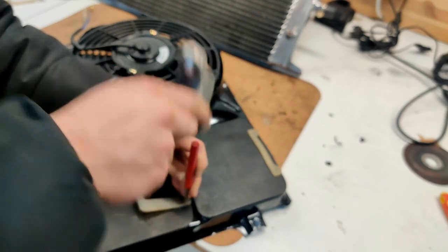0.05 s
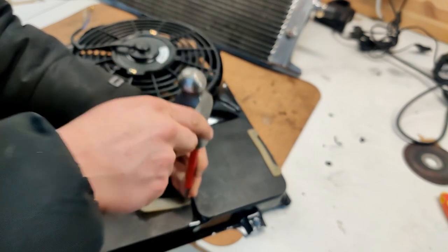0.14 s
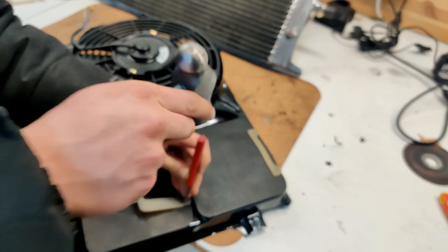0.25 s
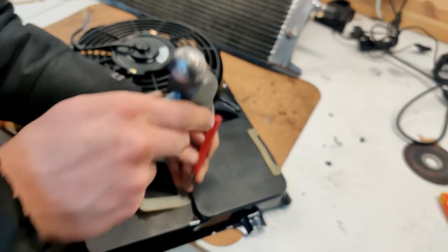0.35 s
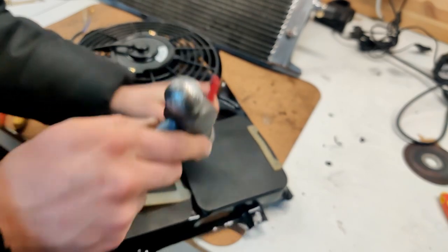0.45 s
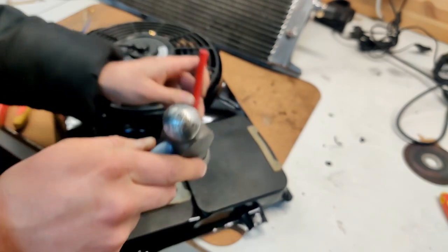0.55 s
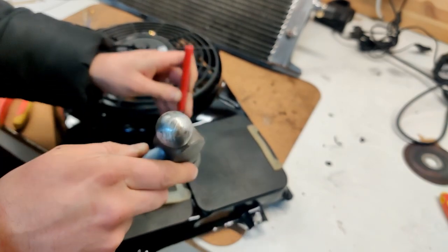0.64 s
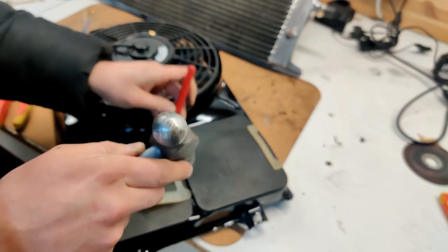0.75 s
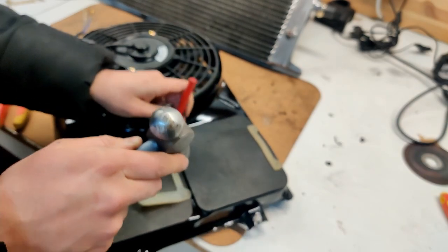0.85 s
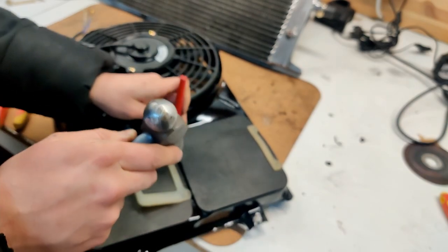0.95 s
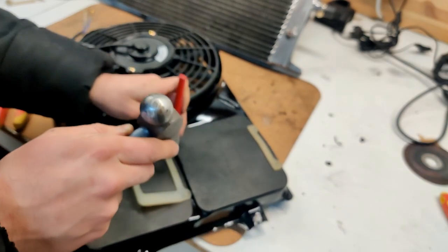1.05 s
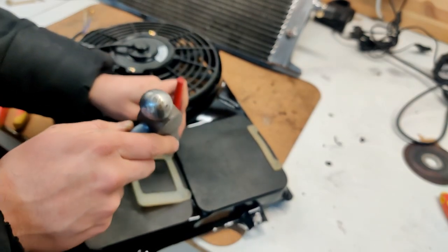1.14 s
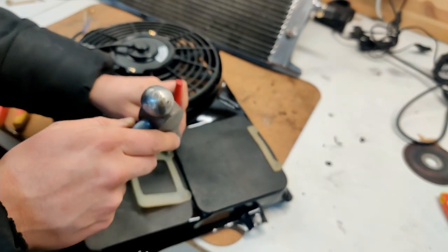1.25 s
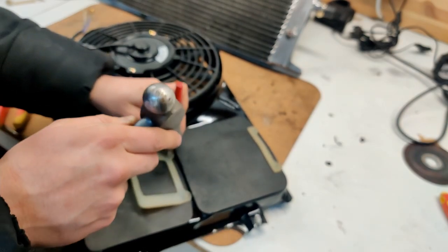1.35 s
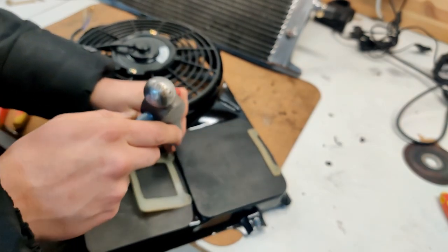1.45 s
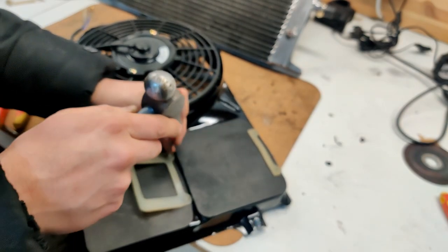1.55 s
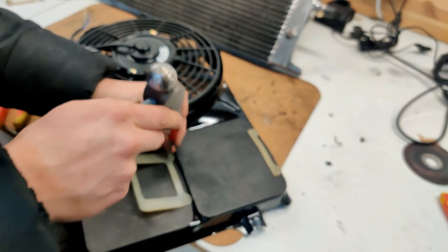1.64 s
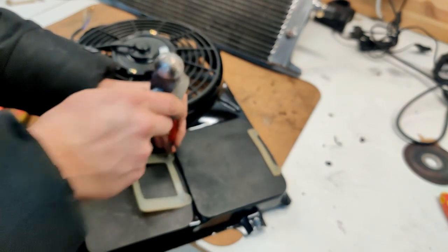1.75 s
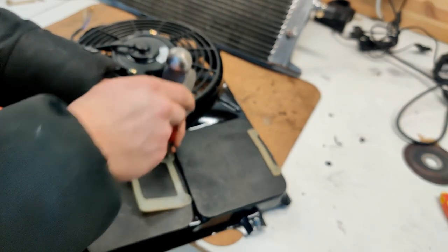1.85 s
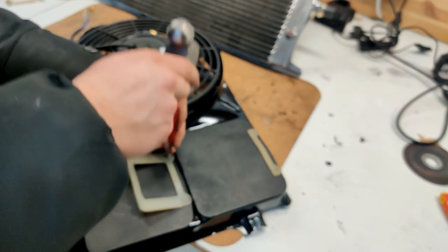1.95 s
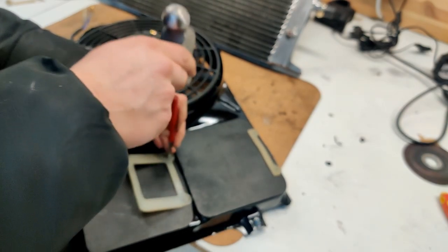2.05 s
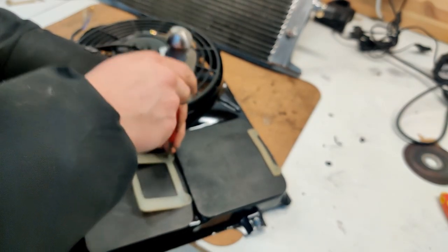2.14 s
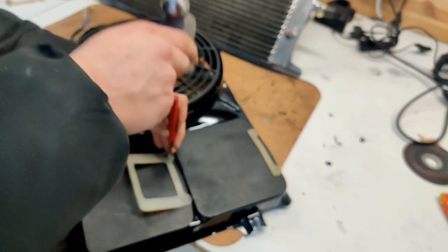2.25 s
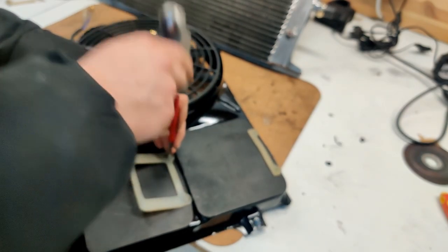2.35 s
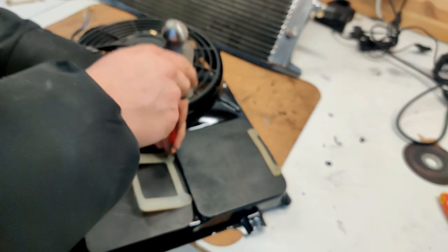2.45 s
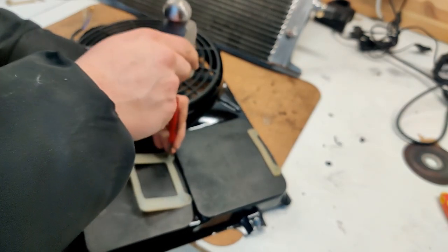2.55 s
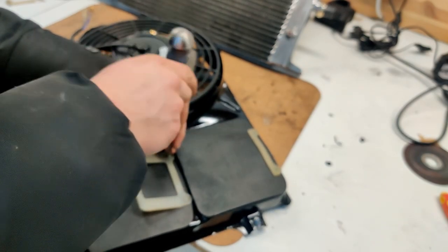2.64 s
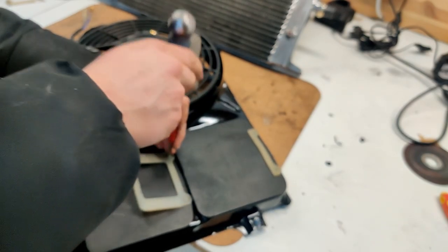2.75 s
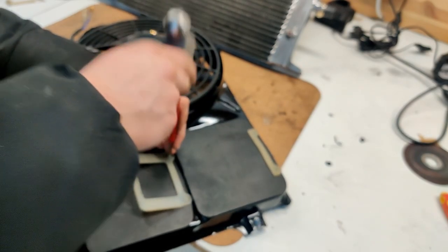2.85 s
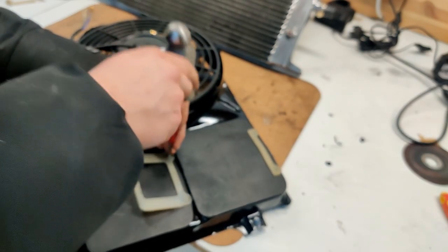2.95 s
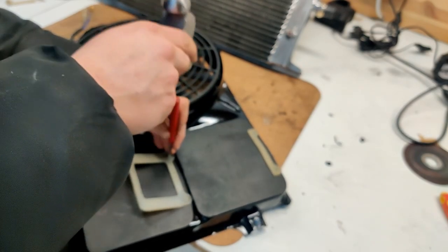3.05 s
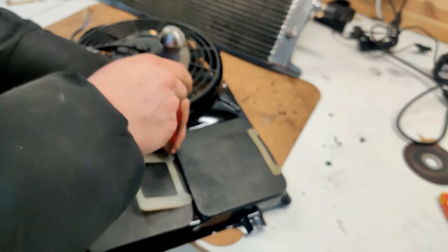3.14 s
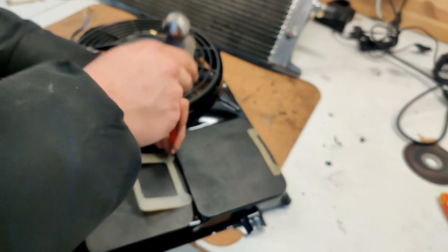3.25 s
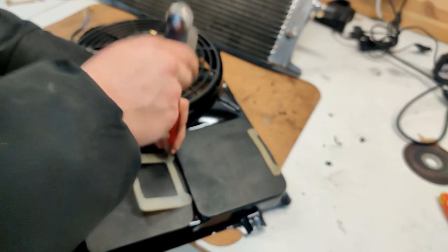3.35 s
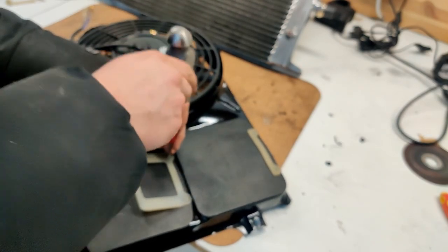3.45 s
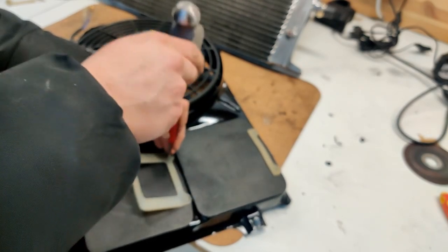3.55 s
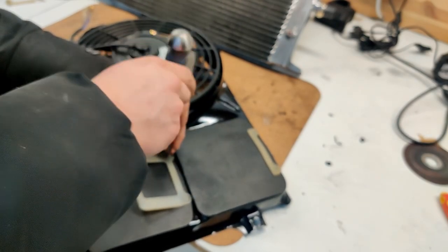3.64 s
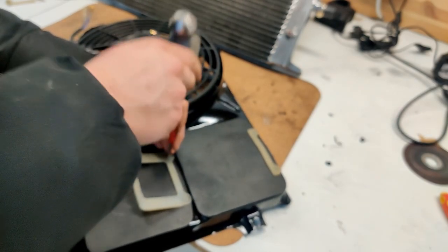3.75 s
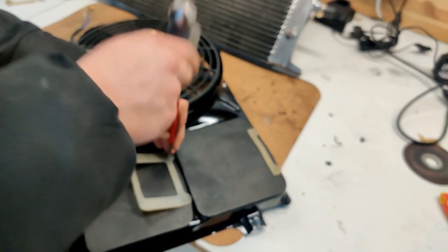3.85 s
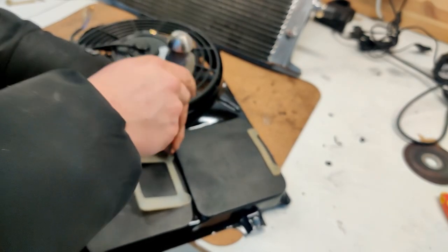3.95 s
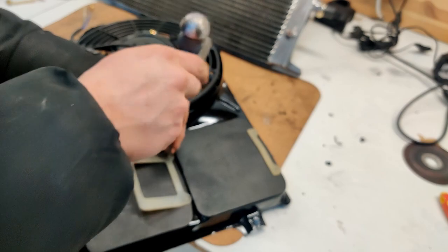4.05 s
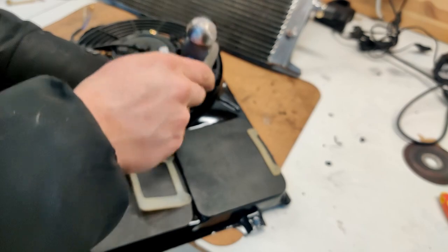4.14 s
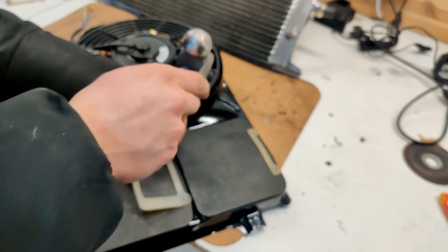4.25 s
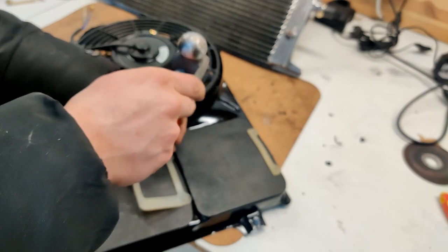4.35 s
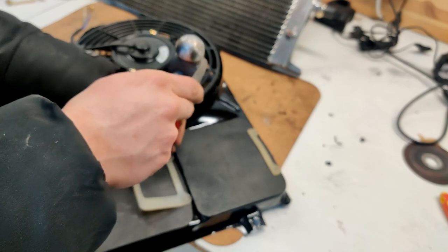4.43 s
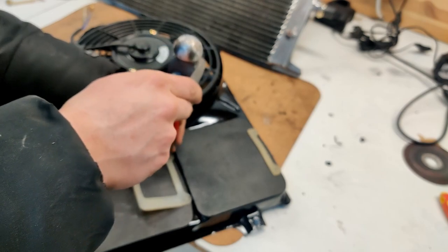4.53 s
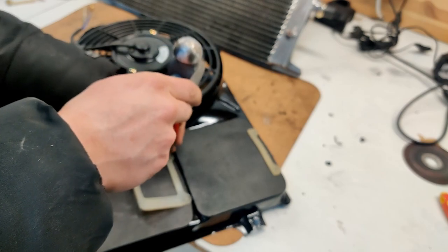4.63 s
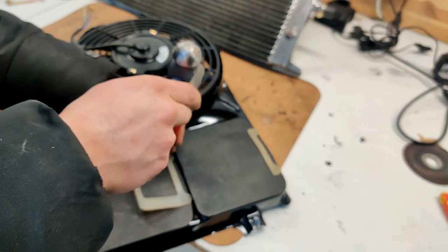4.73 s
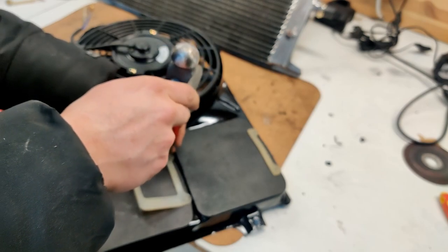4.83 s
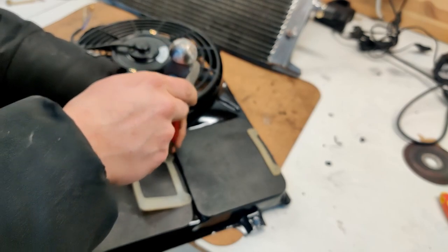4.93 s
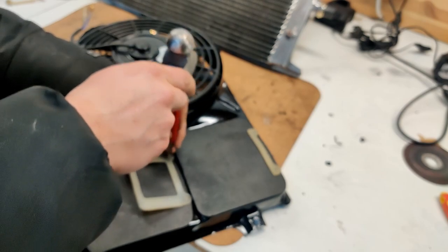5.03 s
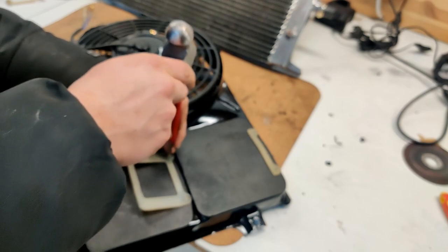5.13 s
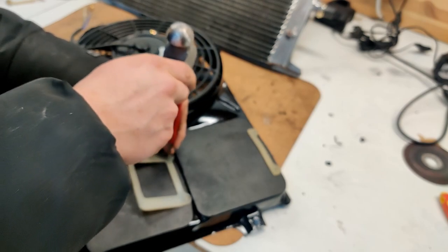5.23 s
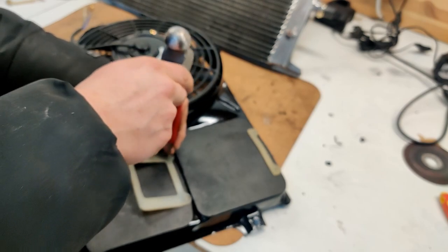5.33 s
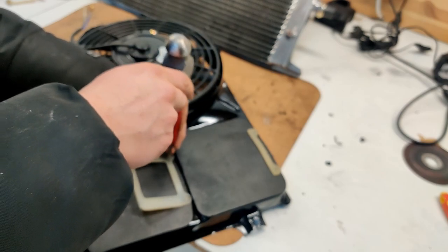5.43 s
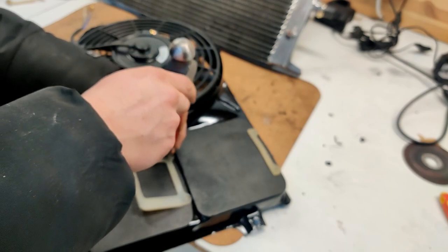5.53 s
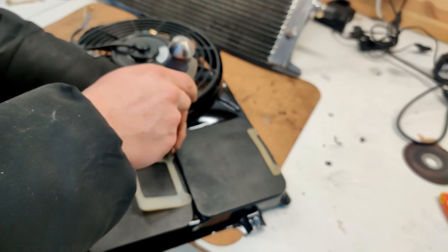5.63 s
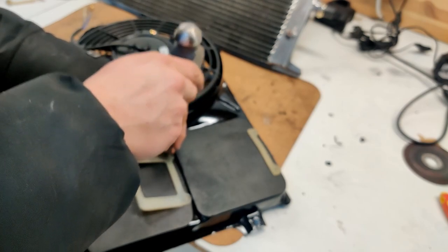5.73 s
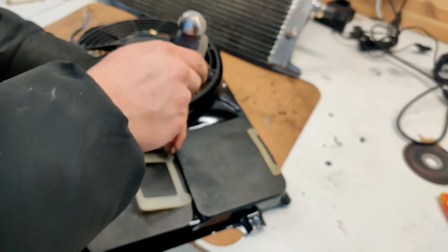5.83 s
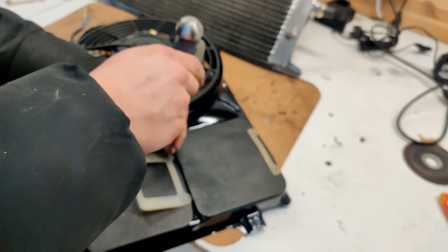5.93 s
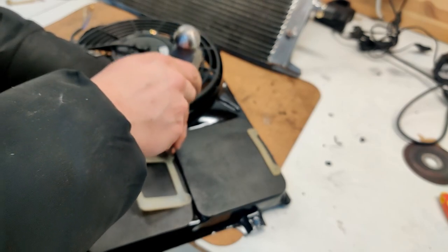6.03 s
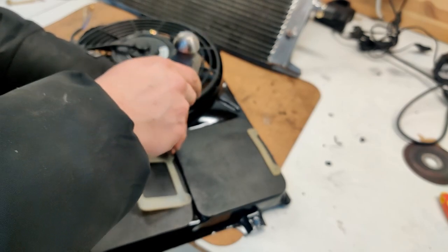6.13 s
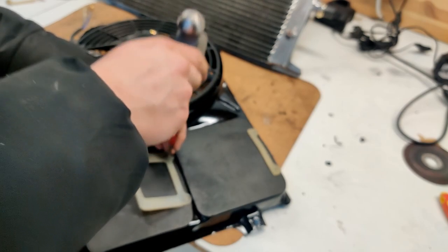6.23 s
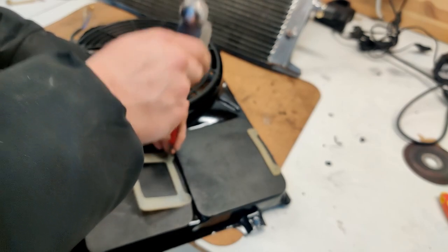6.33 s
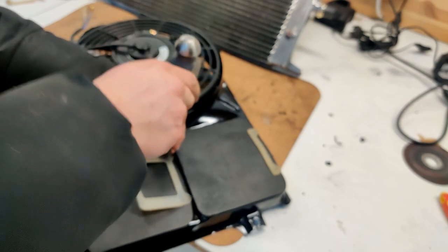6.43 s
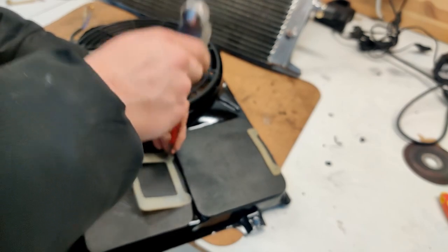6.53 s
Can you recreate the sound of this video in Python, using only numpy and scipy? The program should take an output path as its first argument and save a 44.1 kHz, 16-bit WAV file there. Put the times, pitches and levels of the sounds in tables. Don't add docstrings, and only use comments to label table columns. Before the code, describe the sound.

Sharp, close metallic hammer taps with a plastic clack and brief rattle, broken by soft handling touches on a wooden bench, almost no room noise.

```python
import sys
import numpy as np
from scipy import signal
from scipy.fft import rfft, irfft, next_fast_len
from scipy.io import wavfile
from scipy.ndimage import uniform_filter1d, map_coordinates

SR = 44100
rng = np.random.default_rng(int(sys.argv[2]) if len(sys.argv) > 2 else 0)


def log_audio(samples):
    frames = np.atleast_2d(samples).T
    limited = np.clip(frames, -1, 1)
    pcm = np.round(limited * 32767).astype(np.int16)
    wavfile.write(sys.argv[1], SR, pcm)


def level_to_linear(level):
    exponent = np.asarray(level, float) / 20
    return 10 ** exponent


N = 290178

# freq_hz, density_db_per_hz
FLOOR_SPECTRUM = [(12, -33), (20, -0.5), (91, -23), (193, -22.5), (228, -27), (2820, -42.5), (3530, -39),
                  (5230, -42.5), (11800, -42.5), (16000, -52)]
FLOOR_DB = -73.5
# freq_hz, t60_s
GARAGE_T60 = [(200, 0.63), (1500, 0.36), (10000, 0.34)]
# freq_hz, level_db
WALL_COLOUR = [(100, 0.0), (3000, 0.0), (6000, -4.0), (10000, -13.0)]
CHATTER_START_S, CHATTER_LENGTH_S, CHATTER_DB, CHATTER_FADE_DB_PER_S = 5.72, 0.1, -60, 210

# peak_s, level_db, rise_db_per_s, fall_db_per_s
RUSTLES = [(0.001, -55.5, 202, 199.5), (0.436, -67.5, 31, 22), (0.571, -51.5, 1300, 1100),
           (.592, -51.5, 1500, 700), (0.996, -66.5, 600, 500), (1.525, -70.5, 497, 400),
           (1.921, -71, 118, 146), (2.084, -79.5, 17.5, 147), (4.17, -68.5, 194.5, 25.5),
           (5.254, -68, 902.5, 500), (5.48, -84, 57, 40), (5.503, -72.5, 500.5, 500),
           (6.415, -58.5, 400, 601.5)]
# freq_hz, density_db_per_hz
CLOTH_SPECTRUM = [(120, -43), (200, -10), (263, 2), (334, -3), (1170, -6.5), (1540, -7), (4220, -15.5),
                  (12000, -32), (15600, -73.5), (22000, -120)]

# freq_hz, level_db, start_s, rise_s, t60_s
LEG_MODES = [(37.5, 0.5, .035, 0.026, 1.5), (31, -5, 0.03, .015, .5), (61.6, -12.5, .0, 0.08, 1.6),
             (68, -1, .035, .008, 0.44), (85, -1.5, 0, 0.0013, .121)]
SETTLE_S, STILL_S = 0.26, 0.58
# freq_hz, level_db, t60_s
WOBBLE_MODES = [(35, -4.5, 0.7), (50, 3.5, .6), (60.3, -5.5, .5), (108, -10.5, .4), (135, -13, .35)]
# start_s, level_db
LEAN_EVENTS = [(0.001, -34), (0.53, -37), (0.704, -45), (0.829, -52.5), (1.001, -72), (1.21, -63.5),
               (1.402, -65.5), (1.544, -42), (1.629, -51.5), (1.932, -64), (2.099, -63.5), (4.36, -52),
               (4.549, -61), (4.659, -63.5), (5.27, -55.5), (5.9, -63.5), (6.1, -69)]

# start_s, peak_db, bright_db,
# board_db, tray_db
TOUCH_EVENTS = [(0.001, -48.5, 0.5, 2, -11), (0.434, -46, -16.5, -21.5, -39), (0.529, -36.5, -18, -3, -5.5),
                (0.567, -33.5, -13.5, -41, -34), (0.608, -65, -15, -28, -21),
                (0.704, -57.5, -11.5, 3.5, -18), (0.727, -54, -16, -7, -10),
                (0.959, -52.5, -10.5, -10, -30), (1.208, -57, -17, -3.5, -14), (1.402, -52, -22, -11, -15),
                (1.504, -61.5, -22, -19, -16), (1.544, -57.5, -24, 8.5, -8), (1.566, -52, -10.5, 4.5, -6.5),
                (1.935, -43, -2, -22, -24.5), (4.225, -55.5, -6, -3, -3.5), (4.546, -54, -31.5, -9.5, 0.5),
                (4.639, -69, -8, -9, -10), (4.849, -65, -5, -15, -5), (5.251, -44.5, -23.5, -14, -7.5),
                (5.276, -41, -21.5, -22, -8), (5.954, -60, -12.5, -13.5, -15)]
# freq_hz, level_db, t60_s
BOARD_MODES = [(162, 7, 0.51), (131, -4.5, 0.31)]
# freq_hz, level_db, t60_s
TRAY_MODES = [(272.1, 7.5, 0.2), (320, 2.5, .2)]
# freq_hz, level_db, t60_s
TIP_MODES = [(1800, -7, 0.061), (2600, 1, .07), (3300, -2.5, 0.052), (3900, 0, .12), (4500, -4, .1)]
SCUFF_T60_S = 0.17

# start_s, peak_db, punch_ping_db, bench_thud_db, leg_sway_db
BLOW_EVENTS = [(0.153, -6, -17.5, -31, -30), (2.2, -13, -15.5, -24.5, -33), (2.466, -6.5, -17, -27.5, -29),
               (2.719, -5, -22, -21.5, -29.5), (2.967, -6, -21, -18.5, -30), (3.228, -4.5, -24, -22, -30.5),
               (3.476, -5, -22, -20, -29), (3.725, -5.5, -21, -21.5, -28), (3.977, -4, -23, -21.5, -28),
               (5.565, -24.5, -51.5, -25, -50.5), (6.166, -12.5, -30, -24, -37),
               (6.481, -4, -23.5, -14.5, -33)]
# freq_hz, level_db, t60_s
HOUSING_MODES = [(470, -8, .07), (610, -14, .07), (865, 3, .07), (1090, -8, .07), (1235, -5, .06),
                 (1548, -4, .07), (1700, -6, .06), (1975, -3, .07), (2245, -2, .07), (2450, -4, .07),
                 (2860, -8, .07), (3219, -4, .07), (3520, -2, .08), (3630, -4, .07), (3830, -11, .07),
                 (4460, -13, .07), (4650, -14, .08)]
# freq_hz, level_db, t60_s
SHEET_MODES = [(1055, -4, .16), (1211, 0, .2), (1458, -4, .2), (1916, -3, .2), (2223, -7, .18),
               (2390, -6, .19), (2444, -6, .2), (2567, -6, .18), (2675, -8, .18), (2863, -4, .18),
               (3219, -8, .18), (3267, -8, .18), (3434, -9, .18), (3531, -3, .19), (3617, -8, .18),
               (4037, -10, .2), (4360, -13, .18), (4468, -13, .18), (4600, -13, .18), (4700, -14, .17),
               (4914, -15, .15)]
# freq_hz, level_db, t60_s
PUNCH_MODES = [(5857, -4, .13), (6066, -6, .13), (6637, -7, .13), (6869, -3, .13), (7358, -5, .13),
               (8177, 0, .08), (8344, -2, .1), (9356, -4, .12), (9480, -6, .11), (9650, -4, .12),
               (9862, -6, .12), (10200, -10, .12), (11290, -7, .11)]
# freq_hz, level_db, t60_s
BENCH_MODES = [(110.67, -4, 0.36), (139.7, -2, 0.28), (149, -3, 0.22), (290, -2.5, 0.3), (308, -2.5, 0.27),
               (397, -7, 0.093)]
# freq_hz, density_db_per_hz
CLATTER_SPECTRUM = [(50, -37.5), (80, -4.5), (210, -6.5), (750, -9), (900, -7), (1900, -8), (2400, -9),
                    (3600, -11), (5300, -14), (9600, -19), (11500, -29), (12300, -42), (16000, -56.5)]
# freq_hz, t60_s
CLATTER_T60 = [(100, 0.66), (300, 0.33), (800, 0.19), (2000, 0.16), (5000, 0.16), (11000, 0.043),
               (13000, 0.087)]
# freq_hz, t60_s
RATTLE_T60 = [(300, 0.56), (1000, 0.16), (4000, 0.33), (7000, .33), (10000, 0.29), (12500, .26),
              (16000, .2)]
# freq_hz, level_db
RATTLE_COLOUR = [(4500, -2.0), (6500, -2.5), (11000, -0.47), (12500, 11.5), (15500, 15.5)]
# freq_hz, level_db
SOFT_COLOUR = [(1000, -2), (1600, 2.5), (2200, 0.7), (2600, -7), (3600, -10), (4200, 1.5), (6000, -0.5)]
# freq_hz, slope_db_per_db
HARDNESS_SLOPE = [(4000, 0.0093), (6000, 0.86)]
# freq_hz, t60_s; freq_hz, level_db
CRACK_T60 = [(9000, 0.064), (12500, 0.064), (15000, .09)]
CRACK_COLOUR = [(9000, -31.5), (12000, 0.5), (15000, -6.0), (16300, -28.5)]
# freq_hz, level_db
TICK_COLOUR = [(1500, -20.5), (4000, -1), (11500, -.5), (12500, -14), (16000, -19.5)]
CLACK_DB, CLACK_PER_PING, CRACK_DB, CRACK_PER_PING = -1.5, .22, -7.5, 1.4
BAND_SCATTER_DB = 4
PING_TOP_DB = -20.5
FULL_DB, SOFT_RANGE_DB = -7, 19


def unit(x):
    return x / np.sqrt(np.mean(x ** 2) + 1e-20)


def along(points, hz):
    f, v = np.transpose(points)
    return np.interp(np.log(hz + 1), np.log(f + 1), v)


def coloured(spectrum):
    m = next_fast_len(N)
    gain = level_to_linear(along(spectrum, np.fft.rfftfreq(m, 1 / SR)))
    return unit(irfft(rfft(rng.standard_normal(m)) * gain, m)[:N])


def dying(t60s, colour_db, size):
    hz, t, z = signal.stft(rng.standard_normal(size), SR, nperseg=256)
    start = level_to_linear(colour_db(hz))[:, None]
    fade = level_to_linear(-60 * t / along(t60s, hz)[:, None])
    shaped = z * start * fade / np.sqrt(np.mean(start ** 2))
    return signal.istft(shaped, SR, nperseg=256)[1][:size]


def ringing(modes, t, scatter_db, blur, stretch=1):
    hold = 50
    hz, db, t60 = np.transpose(modes)[:, :, None]
    strength, detune = rng.standard_normal((2, len(modes), 1))
    steps = rng.standard_normal((2, len(modes), len(t) // hold + 1))
    steps = steps * np.sqrt(2 * np.pi * blur * hz / SR / hold)
    walk = np.cumsum(steps, axis=2) * hold
    size = np.repeat(np.cos(walk[1] - walk[1][:, :1]), hold, axis=1)[:, :len(t)]
    size = uniform_filter1d(size, size=hold, axis=1)
    turn = np.repeat(steps[0], hold, axis=1)[:, :len(t)] + 2 * np.pi * hz * (1 + .004 * detune) / SR
    decay = level_to_linear(db + scatter_db * strength) * np.exp(-np.log(1000) * t / (t60 * stretch))
    return np.sum(decay * size * np.sin(np.cumsum(turn, axis=1)), axis=0)


def add(track, s, sound):
    track[round(s * SR):][:len(sound)] += sound


def room_floor():
    return level_to_linear(FLOOR_DB) * coloured(FLOOR_SPECTRUM)


def garage(x):
    tail = dying(GARAGE_T60, lambda hz: along(WALL_COLOUR, hz), size=SR // 2)
    delayed = np.pad(x, (500, 0))
    return signal.fftconvolve(delayed, tail / np.linalg.norm(tail))[:N]


def loose_panel():
    t = np.arange(SR // 20) / SR
    knocks = np.zeros(N)
    knocks[np.cumsum(rng.normal(SR / 44, 60, size=280)).astype(int)] = 1
    since = np.arange(N) / SR - CHATTER_START_S
    fade_db = CHATTER_FADE_DB_PER_S * np.maximum(since - CHATTER_LENGTH_S, 0)
    level = level_to_linear(CHATTER_DB - fade_db) * np.clip(since / .02, 0, 1)
    resonance = np.sin(2 * np.pi * 430 * t) * t / 0.0059 * np.exp(1 - t / 0.0026)
    return level * signal.fftconvolve(knocks, resonance)[:N]


def sleeve():
    t = np.arange(N) / SR
    level = np.zeros(N)
    for s, db, rise, fall in RUSTLES:
        level += level_to_linear(db - np.maximum(rise * (s - t), fall * (t - s)))
    for s, db, *_ in BLOW_EVENTS:
        level += level_to_linear(db - 66) * np.exp(-((t - s + .015) / .03) ** 2)
    grain = map_coordinates(rng.standard_normal(N // 300 + 4), [np.arange(N) / 300])
    return level * unit(level_to_linear(1.5 * grain) * coloured(CLOTH_SPECTRUM))


def bench_sway():
    track, t = np.zeros(N + SR), np.arange(SR * 3 // 4) / SR
    hz, db, start, rise, t60 = np.transpose(LEG_MODES)[:, :, None]
    late = np.maximum(t - start, 0)
    modes = level_to_linear(db - 60 * late / t60) * (1 - np.exp(-late / np.abs(rise))) * np.sin(2 * np.pi * hz * late)
    rock = modes[:2].sum(axis=0) / (1 + (t / SETTLE_S) ** 10)
    rock += modes[2:].sum(axis=0) / (1 + (t / STILL_S) ** 10)
    next_s = [row[0] for row in BLOW_EVENTS[1:]] + [np.inf]
    for (s, _, _, _, sway_db), following in zip(BLOW_EVENTS, next_s):
        end = min(following - s, t[-1] - .01)
        add(track, s, level_to_linear(sway_db) * rock * np.clip(.5 + (end - t) / .02, 0, 1))
    for s, db in LEAN_EVENTS:
        wobble = ringing(WOBBLE_MODES, t, scatter_db=1.5, blur=0.018)
        add(track, s, level_to_linear(db) * wobble * (1 - np.exp(-t / 0.0046)))
    return track[:N]


def touches():
    track, t = np.zeros(N + SR), np.arange(SR // 3) / SR
    scuff_t60 = [(250, 0.59 * SCUFF_T60_S), (600, 0.87 * SCUFF_T60_S),
                 (1200, 0.23 * SCUFF_T60_S), (3000, SCUFF_T60_S)]
    for s, db, bright_db, board_db, tray_db in TOUCH_EVENTS:
        tilt = [(120, -10.5), (300, 1), (500, -2.0), (850, -5.5), (1200, -10.0),
                (1800, bright_db + 1.5), (3000, bright_db - 7.0), (4400, bright_db - 6.5),
                (5100, bright_db - 21), (14000, -80.0)]
        scuff = level_to_linear(-1.5) * dying(scuff_t60, lambda hz: along(tilt, hz), size=len(t))
        knock = level_to_linear(-7.5) * ringing(HOUSING_MODES[1:5], t, scatter_db=1.5, blur=0.0051, stretch=1.2)
        clink = level_to_linear(bright_db - 6.5) * ringing(TIP_MODES, t, scatter_db=6.0, blur=0.0024)
        board = level_to_linear(board_db) * ringing(BOARD_MODES, t, scatter_db=-1, blur=0.0065)
        tray = level_to_linear(tray_db) * ringing(TRAY_MODES, t, scatter_db=0.0, blur=.014)
        onset = 1 - np.exp(-t / 0.00044)
        add(track, s, level_to_linear(db - 5) * (scuff + knock + clink + board + tray) * onset)
    return track[:N]


def hammer():
    track, t = np.zeros(N + SR), np.arange(SR // 3) / SR
    size = len(t)
    late = np.maximum(t - .0015, 0)
    flex = -np.cos(2 * np.pi * 900 * (t - .0015)) * np.exp(-((t - .0014) / .0006) ** 2)
    chirp = np.sin(2 * np.pi * 9450 * late) * np.exp(-((late - .0011) / .0009) ** 2)
    spread = 1 - np.exp(-(t / .0018) ** 2)
    late_drop = level_to_linear(-8 / (1 + np.exp(-(t - .13) / 0.028)))
    fade_out = np.minimum((t[-1] - t) / .08, 1)
    for s, db, ping_db, thud_db, _ in BLOW_EVENTS:
        clack_db = CLACK_DB + CLACK_PER_PING * ping_db
        crack_db = CRACK_DB + CRACK_PER_PING * ping_db
        soft = np.clip((FULL_DB - db) / SOFT_RANGE_DB, 0, 1)
        excess_db = ping_db - clack_db + 10.5

        def shaded(modes):
            return [(hz, level + soft * along(SOFT_COLOUR, hz), t60) for hz, level, t60 in modes]

        def clatter_db(hz):
            colour = along(CLATTER_SPECTRUM, hz) + soft * along(SOFT_COLOUR, hz)
            return colour + excess_db * along(HARDNESS_SLOPE, hz)

        def rattle_db(hz):
            uneven = BAND_SCATTER_DB * rng.standard_normal(len(hz))
            return clatter_db(hz) + along(RATTLE_COLOUR, hz) + uneven

        housing = level_to_linear(clack_db - 1) * ringing(shaded(HOUSING_MODES), t, scatter_db=2.5, blur=.004)
        sheet = level_to_linear(clack_db - 12) * ringing(shaded(SHEET_MODES), t, scatter_db=3, blur=.0055)
        loose = level_to_linear(clack_db - 8) * dying(CLATTER_T60, clatter_db, size)
        rattle = level_to_linear(clack_db - 19) * dying(RATTLE_T60, rattle_db, size)
        shake = level_to_linear(3 * map_coordinates(rng.standard_normal(60), [t * 90]))
        crack = level_to_linear(crack_db + 2.5) * dying(CRACK_T60, lambda hz: along(CRACK_COLOUR, hz), size)
        tick = level_to_linear(ping_db + 3.0) * dying([(5000, 0.019)], lambda hz: along(TICK_COLOUR, hz), size)
        ping = level_to_linear(min(ping_db, PING_TOP_DB) + 8) * chirp
        steel = level_to_linear(ping_db - 4) * ringing(PUNCH_MODES, late, scatter_db=4, blur=.0025, stretch=1.05)
        thud = level_to_linear(thud_db) * ringing(BENCH_MODES, t, scatter_db=2.0, blur=.03)
        thud = thud * (1 - np.exp(-t / 0.0015))
        body = tick + spread * late_drop * (housing + sheet + loose + shake * rattle + steel)
        add(track, s + .0015, level_to_linear(db) * (flex + crack + ping + body + thud) * fade_out)
    return track[:N]


def scene():
    work = hammer() + touches()
    background = room_floor() + loose_panel() + sleeve() + bench_sway()
    return (work + level_to_linear(-29.0) * garage(work) + background)[None]


def top_cut(x):
    return signal.sosfilt(signal.butter(12, 16710, fs=SR, output="sos"), x)


def record(dry):
    limited = dry / (1 + np.abs(dry / .97) ** 8) ** (1 / 8)
    low_pass = signal.ellip(8, .5, 60, 16000, fs=SR, output="sos")
    mix = signal.sosfilt(low_pass, limited)
    return top_cut(mix)


dry = scene()
out = record(dry)
log_audio(out)
```